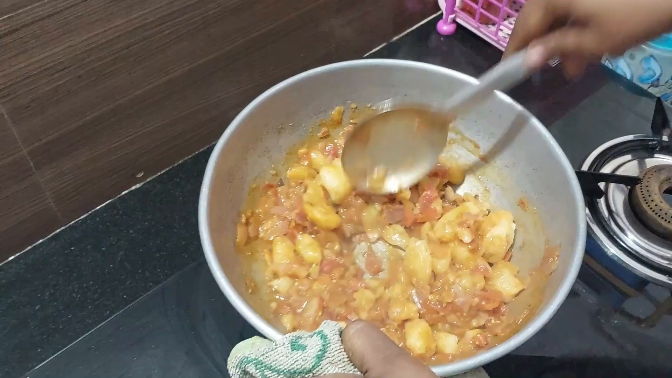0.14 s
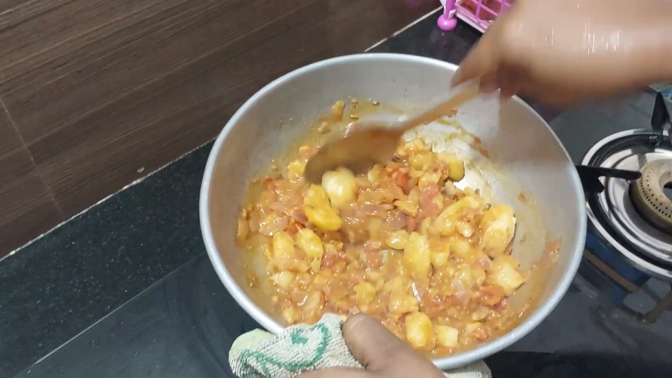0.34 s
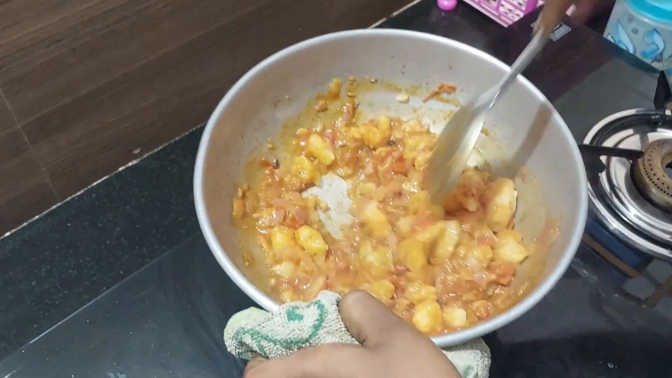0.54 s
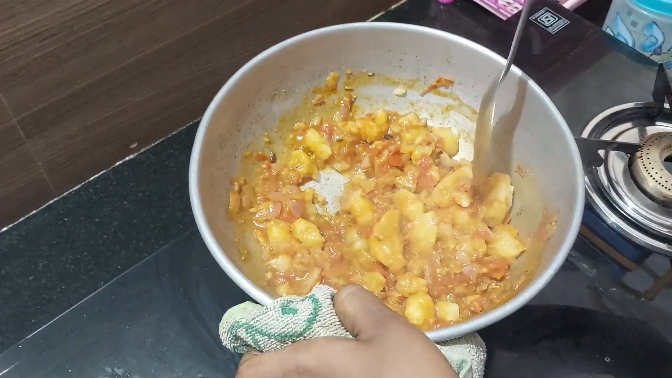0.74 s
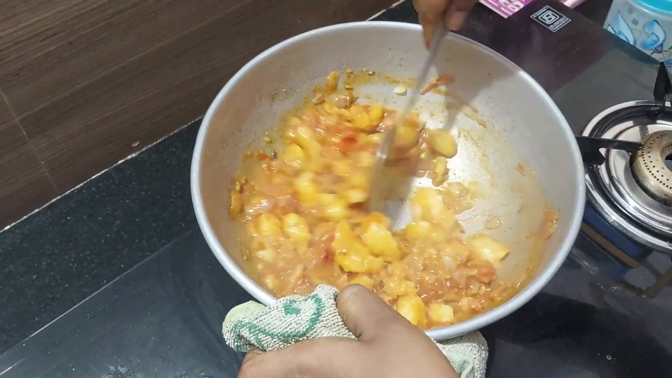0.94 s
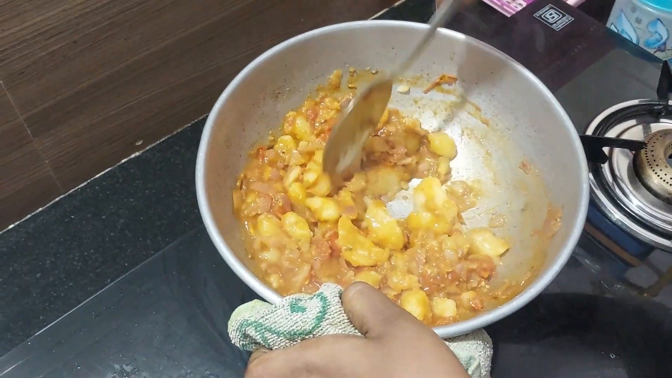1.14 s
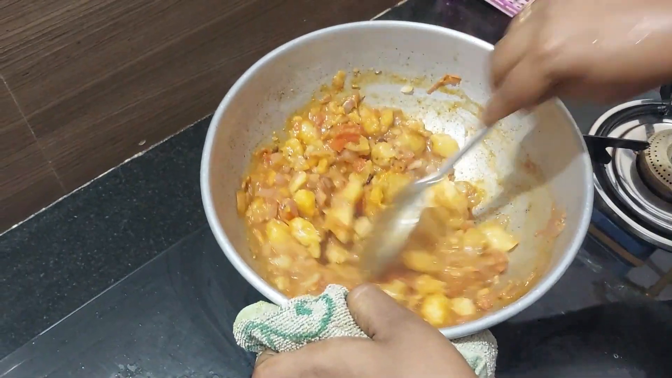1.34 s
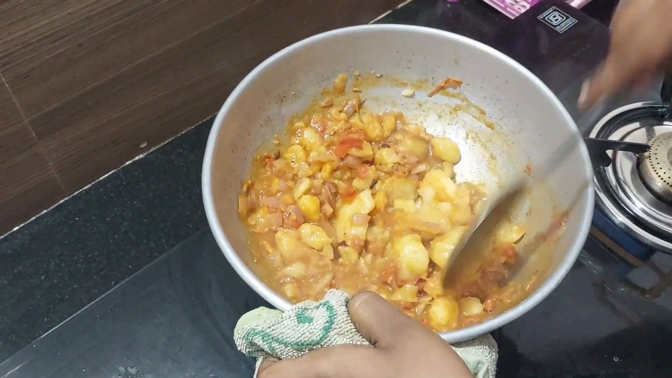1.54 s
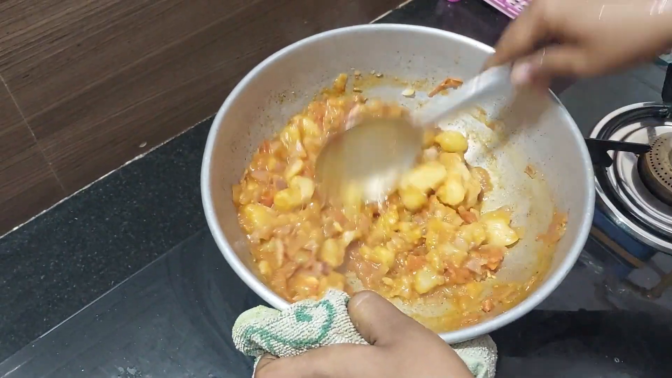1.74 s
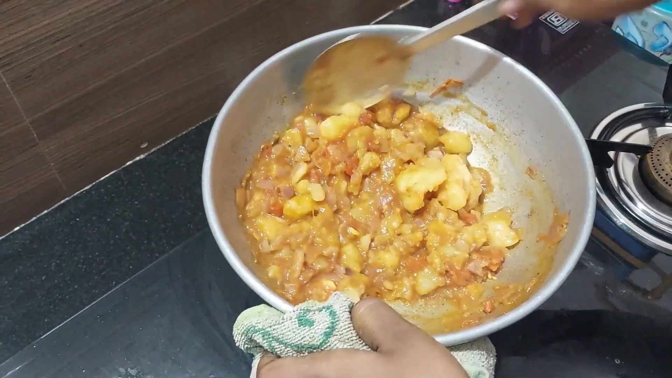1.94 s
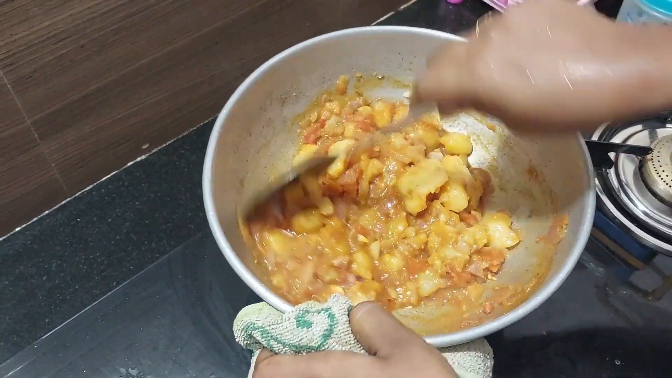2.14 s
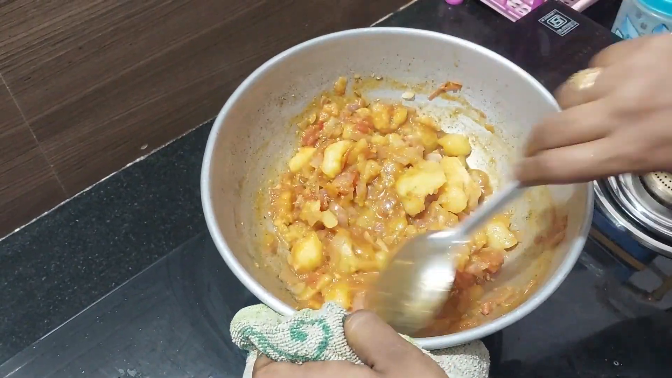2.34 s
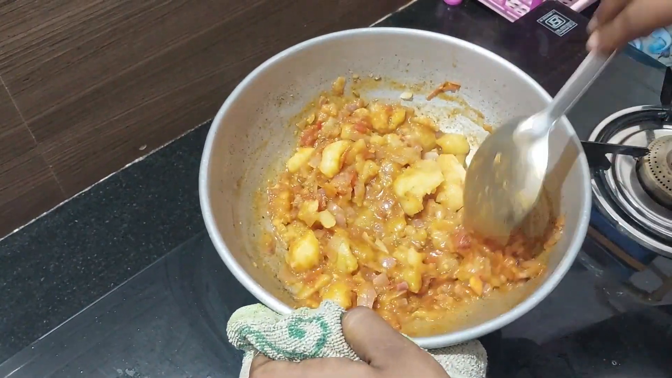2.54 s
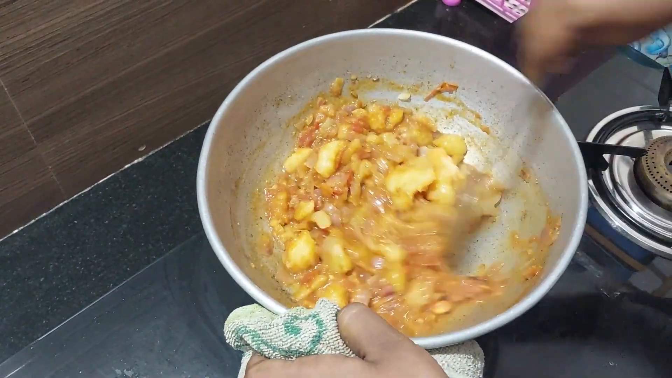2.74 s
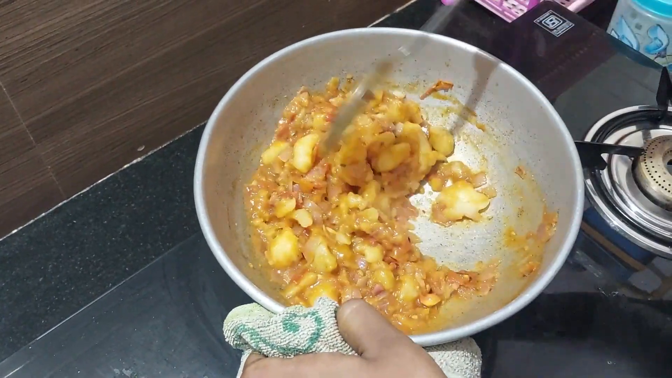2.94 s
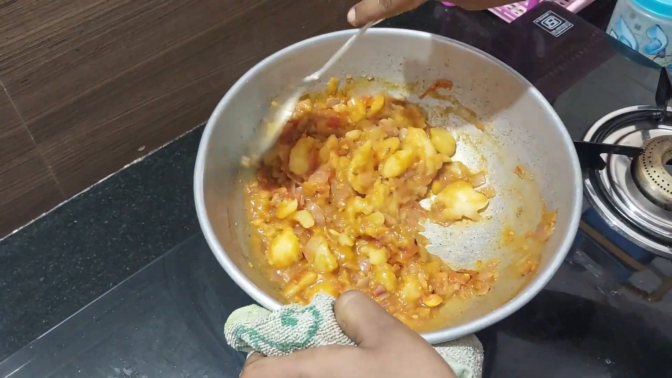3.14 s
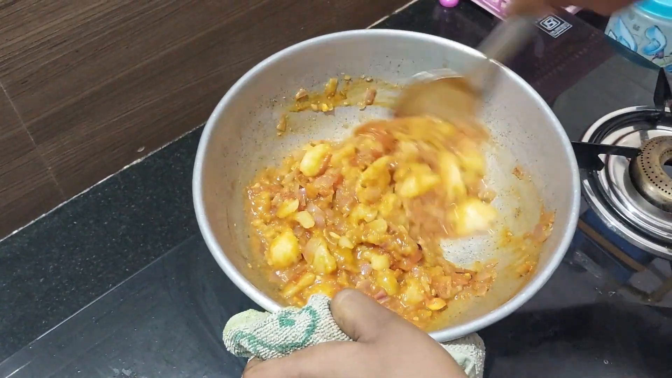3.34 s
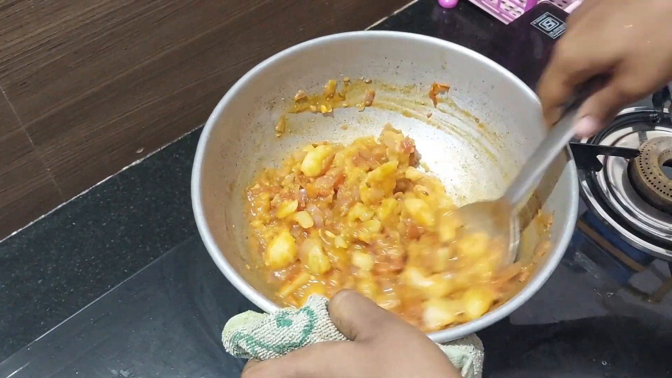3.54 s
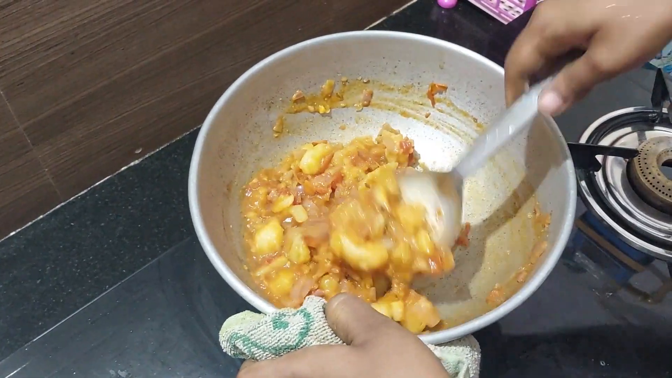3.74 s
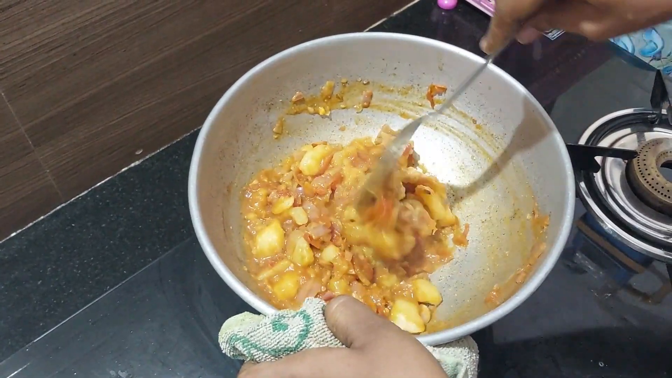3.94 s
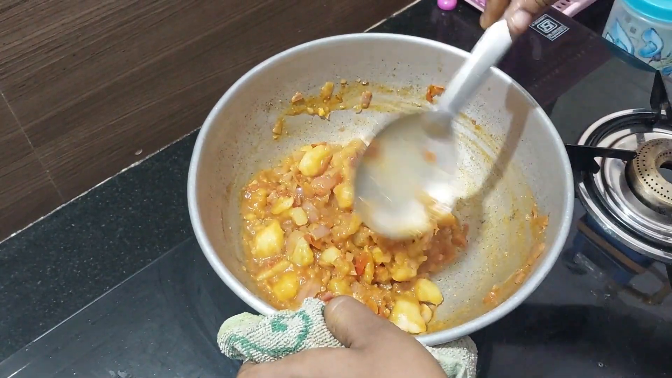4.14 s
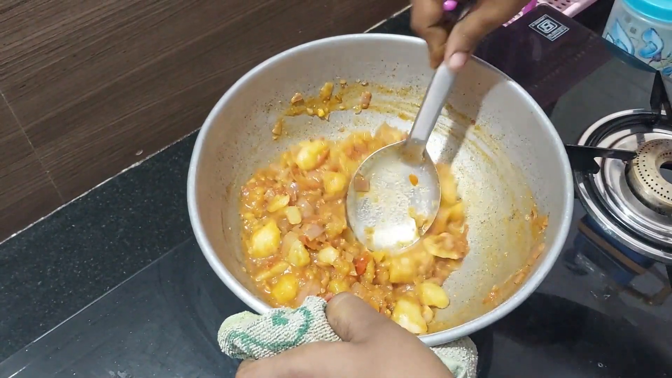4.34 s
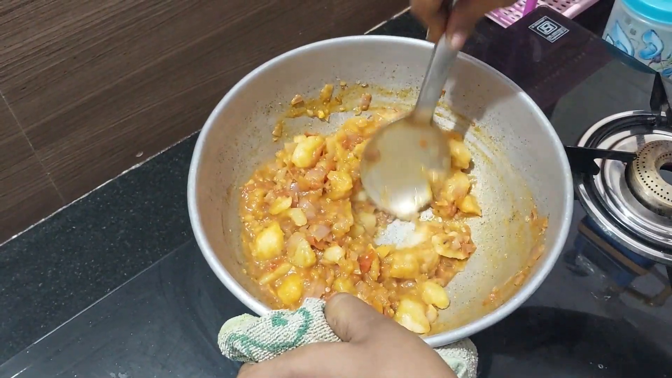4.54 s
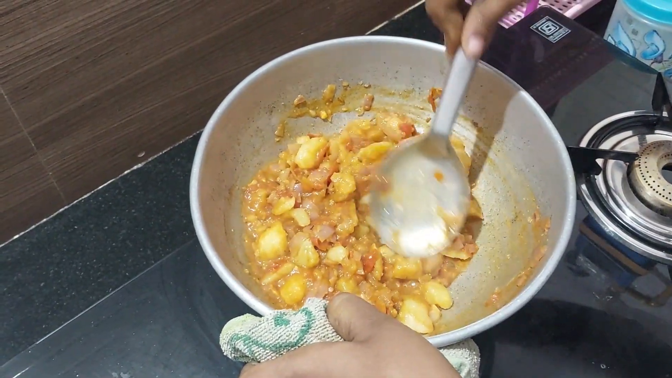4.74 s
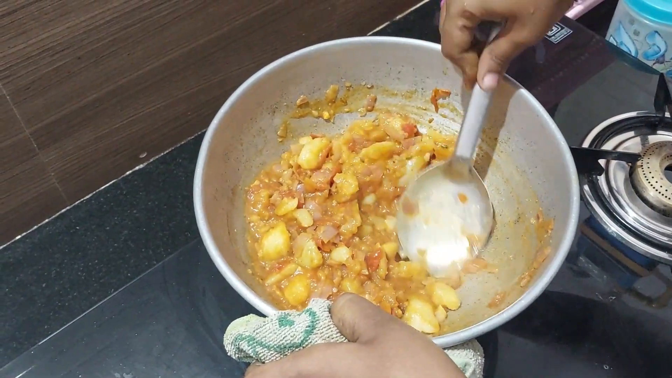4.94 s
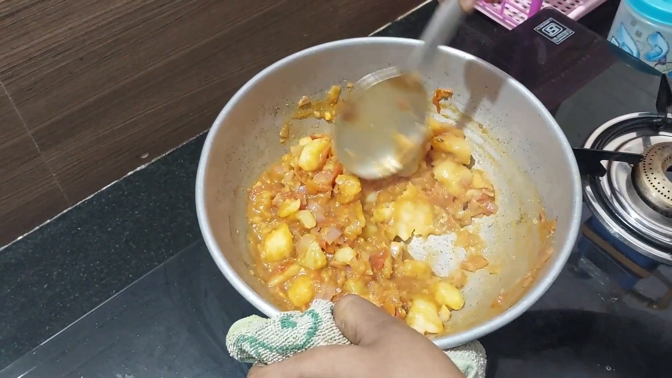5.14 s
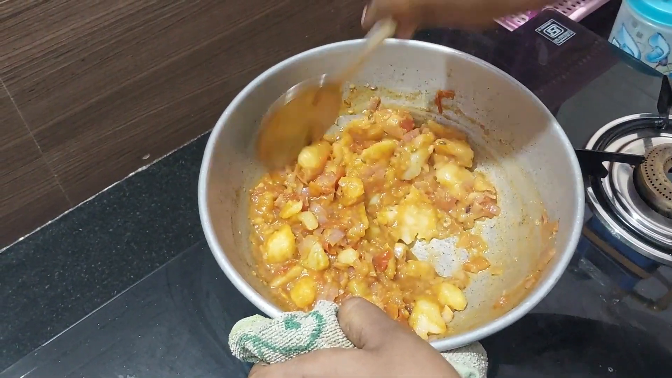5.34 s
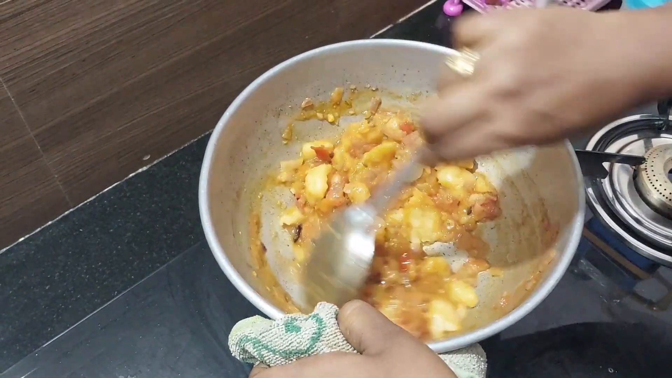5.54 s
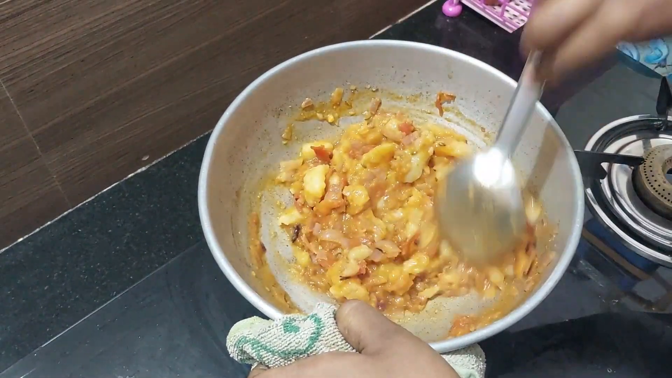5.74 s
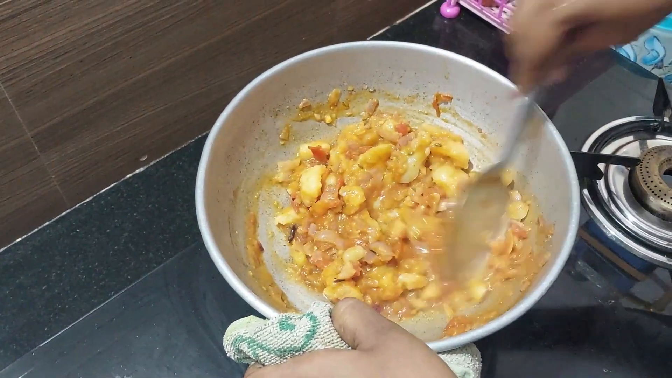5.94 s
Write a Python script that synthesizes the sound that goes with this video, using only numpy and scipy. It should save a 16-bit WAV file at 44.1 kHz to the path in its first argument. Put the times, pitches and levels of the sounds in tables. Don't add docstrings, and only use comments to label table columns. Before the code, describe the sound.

Irregular stirring recorded close on a phone: hard metallic knocks and gritty scrapes make a thin pan ring briefly, while sauce whispers and smacks in tiny wet ticks. The strongest strokes come at about one, two to two and a half, just over three, and five and a half seconds. Between them are light taps, low counter bumps, short hard-room echo and faint hiss.

```python
import sys
import numpy as np
from scipy import signal
from scipy.fft import rfft, irfft, next_fast_len
from scipy.io import wavfile
from scipy.ndimage import uniform_filter1d, map_coordinates

SR = 44100
rng = np.random.default_rng(int(sys.argv[2]) if len(sys.argv) > 2 else 0)


def rack_gain(trim_db):
    fader = np.asarray(trim_db, float)
    return 10 ** (fader / 20)


def generate_wav(signal):
    frames = np.transpose(np.atleast_2d(signal))
    scaled = np.clip(frames, -1, 1) * 32767
    pcm = np.round(scaled).astype(np.int16)
    wavfile.write(sys.argv[1], SR, pcm)


N = 268392


def unit(x):
    return x / np.sqrt(np.mean(np.abs(x) ** 2) + 1e-20)


def along(points, hz):
    f, v = np.transpose(points)
    return np.interp(np.log(hz + 1), np.log(f + 1), v)


def wobble(rate, size=N):
    knots = rng.standard_normal(int(size * rate / SR) + 4)
    return map_coordinates(knots, [np.arange(size) * rate / SR])


def ringing(modes, f):
    total = 0
    for k, (centre, width, db) in enumerate(modes):
        resonance = 1j * f * width / (centre * centre - f * f + 1j * f * width)
        total = total + (-1) ** k * rack_gain(db) * resonance
    return total


def body(modes, f, bed_db):
    tops = np.array(modes)[:, ::2]
    return ringing(modes, f) + rack_gain(along(tops, f) + bed_db)


def band(f, lo, hi):
    def pole(u):
        return 1 / (1 - u * u + np.sqrt(2) * 1j * u) ** 2
    return pole(f / hi) * np.conj(pole(lo / (f + 1)))


def stereo(pair, f, alike, lead_ms, lean_db):
    turn = np.arccos(np.clip(along(alike, f), -1, 1)) / 2
    mid, side = pair[0] * np.cos(turn), pair[1] * np.sin(turn)
    shift = rack_gain(lean_db / 2) * np.exp(1j * np.pi * f * lead_ms / 1000)
    return np.array([(mid + side) * shift, (mid - side) / shift])


def friction(size, chatter_db, grit):
    struck = rng.random((2, size)) < .02
    grains = struck * np.minimum(rng.exponential(size=(2, size)), 3.0)
    rub = rng.standard_normal((2, size)) * (1 + grit * unit(grains))
    chatter = chatter_db * wobble(68.9, size=size) + wobble(28.5, size=size)
    return unit(rub * rack_gain(chatter))


def patchy(x, depth_db):
    z = signal.stft(x, nperseg=512)[2]
    field = uniform_filter1d(rng.standard_normal(z.shape[1:]), size=5, axis=0)
    field = uniform_filter1d(field, size=11, axis=1)
    return signal.istft(z * rack_gain(depth_db * unit(field)), nperseg=512)[1][:, :N]


# (frequency [Hz], density [dB per Hz])
HUSH = [(15, -46), (25, -1), (100, -2.5), (480, -15), (1200, -21), (2300, -21.5), (3400, -29), (16300, -34)]
# (frequency [Hz], likeness [0-1])
HUSH_ALIKE = [(60, 0.38), (300, 0.64), (800, 0.3), (3000, 0.77)]


def hush():
    m = next_fast_len(N)
    f = np.fft.rfftfreq(m, 1 / SR)
    air = rfft(rng.standard_normal((2, m))) * rack_gain(along(HUSH, f))
    air = irfft(stereo(air, f, HUSH_ALIKE, lead_ms=0.16, lean_db=-3.0), m)[:, :N]
    return rack_gain(-53.5 + 0.47 * wobble(7.9)) * unit(air)


# (frequency [Hz], t60 [s])
KITCHEN = [(200, 0.52), (2000, 0.44), (10000, 0.072)]


def kitchen(x):
    hz, t, z = signal.stft(rng.standard_normal((2, SR // 2)), SR, nperseg=256)
    z[1, hz < 1200] = z[0, hz < 1200]
    decay = rack_gain(-60 * t / along(KITCHEN, hz)[:, None])
    tail = signal.istft(z * decay, SR, nperseg=256)[1]
    tail = tail / np.linalg.norm(tail[0])
    late = np.pad(x, ((0, 0), (300, 0)))
    return signal.fftconvolve(late, tail, axes=1)[:, :N]


# (frequency [Hz], width [Hz], level [dB])
COUNTER = [(68.7, 84, -13.5), (96, 32.5, -4.5), (133, 13, -4), (170.3, 10, -5.5)]
# (time [s], peak level [dB], settling [dB/s])
JOLTS = [(.21, -54, 60), (.34, -54, 40), (.54, -49, 76), (1.01, -41, 79), (1.08, -35, 194),
         (1.71, -37.5, 103), (1.8, -52, 198), (2.1, -37, 61), (2.17, -57, 170), (2.34, -48, 144),
         (2.521, -40.5, 90), (2.78, -36.5, 223), (2.93, -39, 143), (3.05, -46.5, 142), (3.25, -41, 88),
         (3.58, -50, 47), (4.56, -46.5, 91), (4.98, -43.5, 47), (5.17, -49, 110), (5.59, -41, 68),
         (5.761, -44, 179), (6.09, -29.5, 101)]


def rocking():
    tip_db_per_s, rest_db, sway_hz = 376, -65.5, 68.5
    t = np.arange(N) / SR
    push = rack_gain(rest_db)
    for s, db, fall in JOLTS:
        lost_db = np.where(t < s, tip_db_per_s * (s - t), fall * (t - s))
        push = push + rack_gain(db - lost_db)
    m = next_fast_len(N + SR // 2)
    f = np.fft.rfftfreq(m, 1 / SR)
    stone = unit(ringing(COUNTER, f) * band(f, 47, 191))
    boom = rfft(rng.standard_normal((2, N)) * push, m) * stone
    boom = irfft(stereo(boom, f, [(60, 0.94)], lead_ms=0.45, lean_db=2.5), m)[:, :N]
    pitch_hz = sway_hz * (1 + 0.043 * wobble(22.0))
    sway = np.sin(2 * np.pi * np.cumsum(pitch_hz) / SR) * push * rack_gain(4.8 * wobble(16))
    return boom + rack_gain([[2.2], [.1]]) * sway


# (time [s], level [dB])
STIR = [(0, -50.5), (.3, -61), (.9, -50), (1.5, -53.5), (2.03, -61), (2.801, -49.5), (3.15, -59),
        (3.95, -59.5), (4.28, -78), (4.799, -54.5), (5.301, -64), (6.08, -68)]


def squelch():
    s, db = np.transpose(STIR)
    f = np.fft.rfftfreq(N, 1 / SR)
    rub = rfft(friction(N, chatter_db=1.5, grit=.25))
    wet = irfft(rub * body(RIM["dull"], f, bed_db=9.0) * band(f, 2700, 16000), N)
    level_db = np.interp(np.arange(N) / SR, s, db) - 4.0
    return rack_gain(level_db) * patchy(unit(wet), depth_db=2.5)


# (time [s], peak level [dB], frequency [Hz])
TICKS = [(0.073, -41, 11000), (0.15, -30, 6800), (.391, -52, 12000), (.4219, -41, 10600),
         (0.496, -33.5, 5470), (0.508, -40, 5600), (0.525, -46, 3260), (.853, -45, 7450),
         (0.875, -42, 5200), (0.963, -29, 4040), (1.0834, -37, 11000), (1.321, -37, 5760),
         (1.462, -50, 7600), (1.495, -54, 5070), (1.7754, -41.5, 12500), (1.837, -40.5, 5600),
         (1.874, -31, 7200), (2.074, -21.5, 7530), (2.72, -31, 6840), (2.8217, -31.5, 4760),
         (2.901, -44, 12600), (2.968, -38, 6900), (2.9956, -46, 12100), (3.307, -21.5, 6350),
         (3.5274, -25, 6200), (3.547, -32, 10000), (3.592, -32, 11900), (3.645, -29.5, 6100),
         (3.758, -34.5, 6470), (4.002, -33.5, 7070), (4.0457, -46, 11500), (4.572, -44, 9000),
         (4.676, -47, 12600), (4.7845, -50, 10300), (4.866, -42, 10600), (4.901, -34, 6400),
         (4.9362, -45, 9000), (5.1218, -46, 10900), (5.4304, -31.5, 6650), (1.199, -37, 5300),
         (4.386, -36.5, 5860), (2.78, -46, 7000), (2.942, -46, 9000), (5.962, -34, 7750),
         (5.976, -35, 9260)]


def smacks():
    out, t = np.zeros(N + SR), np.arange(SR // 40) / SR
    for s, db, hz in TICKS:
        spread = rng.standard_normal(8)
        pitches = np.clip(hz * np.exp(.12 * (spread - spread.mean())), 2000, 15500)
        ring = np.sin(2 * np.pi * pitches * t[:, None]).sum(axis=1)
        envelope = rack_gain(db - 1.5 - 60 * t / .008) * (1 - np.exp(-t / .00024))
        out[round(s * SR):][:len(t)] += envelope * ring
    return np.array([out[3:N + 3], out[:N]])


# (time [s], peak level [dB], frequency [Hz], t60 [s])
CHIMES = [(.972, -26, 2010, 0.17), (1.0, -41, 1002, 0.36), (1.0, -45, 834, 0.72), (1.145, -41, 975, 0.42),
          (1.335, -43.5, 3200, 0.14), (2.111, -27, 4050, 0.11), (2.15, -22.5, 3820, 0.58),
          (2.118, -30, 2900, 0.5), (2.13, -29.5, 1340, 0.74), (2.33, -27, 2190, 0.39),
          (2.386, -25, 1620, 0.07), (2.394, -18, 1250, 0.095), (2.461, -25, 1402, 0.25),
          (2.394, -15.5, 538, .15), (2.99, -55, 3483, 0.11), (2.99, -44, 2120, 0.098),
          (3.192, -20, 3855, 0.26), (3.265, -17, 2447, 0.11), (3.36, -18, 2330, 0.088),
          (3.393, -15.5, 3350, 0.058), (3.397, -29, 3050, 0.093), (3.51, -30, 1037, 0.1),
          (3.511, -28.5, 1680, 0.084), (4.572, -35, 2004, 0.072), (.282, -51.5, 618, .4),
          (2.29, -22, 1163, 0.53), (5.06, -38, 432, 0.33), (4.951, -34, 428, 0.43),
          (0.451, -52, 1150, 0.32), (4.95, -39, 3400, 0.036), (5.04, -35, 3180, 0.059),
          (5.06, -56, 3660, 0.072), (5.325, -61, 2750, 0.38), (5.331, -63, 2490, 0.77),
          (5.483, -44, 3890, .5), (5.575, -19.5, 3810, 0.088), (5.64, -32, 3150, 0.2),
          (5.685, -37, 3200, 0.28), (5.62, -30, 834, 0.89), (5.6, -19.5, 504.3, 0.31)]


def chimes():
    rise_s, beat_db, shared = .004, 4, 0.55
    out, t = np.zeros((2, N + SR)), np.arange(SR // 2) / SR
    for s, db, hz, t60 in CHIMES:
        drift = np.array([wobble(65, size=len(t)) for _ in "LR"])
        drift = (drift + shared * drift[::-1]) / np.hypot(1, shared)
        ring = np.sin(2 * np.pi * hz * t + 2.1 * drift) * rack_gain(beat_db * drift[::-1])
        envelope = rack_gain(db - 60 * t / t60) * (1 - np.exp(-t / rise_s))
        envelope = envelope * np.minimum(10 - 20 * t, 1)
        out[:, round(s * SR):][:, :len(t)] += envelope * ring
    return out[:, :N]


# (frequency [Hz], likeness [0-1])
ALIKE = [(150, 1), (400, 0.9), (700, 0.81), (1200, 0.53), (2000, 0.36), (5000, 0.15), (12000, 0.16)]
# (frequency [Hz], left over right [dB])
LEAN = [(200, -4), (700, 3), (1500, -2), (3000, -4.5), (6000, -3.5), (10000, 2.5)]


def contact(row, metals, edges_hz, lead_ms, lean_db, f, swell_power, linger_s, upper_faster, knock):
    start, swell, db, fall, upper_db = row
    contact_s, knock_s, sudden_s = .56, 0.0011, 0.0014
    t = np.arange(round(contact_s * SR)) / SR
    after = np.maximum(t - swell, 0)
    lost_db = fall * after ** 2 / (after + linger_s)
    force = friction(len(t), chatter_db=1.2, grit=.45)
    force = force * np.minimum(t / swell, 1) ** swell_power
    force = force * np.minimum((contact_s - t) * 10, 1)
    force = force * (1 + knock * np.exp(-t / knock_s - (swell / sudden_s) ** 2))
    m = 2 * len(f) - 2
    levels = [db - lost_db, db + upper_db - upper_faster * lost_db]
    sound = 0
    for level, metal, lo, hi in zip(levels, metals, edges_hz, edges_hz[1:]):
        sound = sound + rfft(force * rack_gain(level), m) * unit(metal * band(f, lo, hi))
    heard = irfft(stereo(sound, f, ALIKE, lead_ms, lean_db + along(LEAN, f)), m)
    return round(start * SR), heard


# (start [s], swell [s], belly peak level [dB], letting go [dB/s], wall over belly [dB])
PUSHES = [(0, 0.00053, -54.5, 205, -5.5), (.26, 0.014, -55, 191, -18), (.447, 0.0038, -45, 132, -11.5),
          (.971, 0.0025, -26, 161, 0), (1.316, .006, -58, 142, 3), (1.674, 0.0091, -35.5, 149, -5.5),
          (2.06, 0.16, -31.5, 197, 3.5), (2.2, 0.23, -22, 146, 11), (2.728, 0.0034, -35, 247, -8.5),
          (2.866, 0.0012, -36, 162, -8.5), (2.989, 0.0048, -44.5, 214, 7), (3.191, 0.0006, -32.5, 84, 4.5),
          (3.335, 0.03, -36.5, 450, 11), (3.512, 0.002, -52, 508, 15.5), (3.515, 0.057, -43, 92, -1),
          (3.832, 0.0047, -46.5, 95, 2.5), (4.45, 0.13, -47.5, 499, -1.5), (4.654, 0.00099, -39.5, 268, 1),
          (4.87, 0.026, -59, 148, 4), (4.948, 0.0014, -36.5, 110, -14.5), (5.02, 0.047, -34.5, 205, -6.5),
          (5.088, 0.006, -45, 155.5, 2), (5.476, 0.056, -33, 113, 1), (5.55, 0.056, -21.5, 193, 1.5),
          (6.06, 0.069, -59, 104, 15)]
PLACES = ("sauce sauce sauce far far sauce edge near sauce sauce sauce rim " "slide slide sauce sauce sauce sauce sauce bottom bottom sauce side side side").split()
# (start [s], swell [s], blade peak level [dB], letting go [dB/s], edge hiss over blade [dB])
SLIDES = [(0, 0.0038, -56.5, 55, 1.5), (.36, 0.18, -58.5, 81, 5.5), (.872, 0.0036, -60.5, 110, 8),
          (0.969, 0.0016, -25.5, 163, -3.5), (1.318, 0.0051, -54, 129, 0), (1.678, 0.14, -56, 152, 1),
          (2.078, 0.14, -32, 296, 4), (2.111, 0.12, -29, 498, 3.5), (2.25, 0.12, -27.5, 120, 6.5),
          (2.36, 0.12, -25.5, 260, 4.5), (2.728, 0.043, -55.5, 195, 2.5), (2.821, 0.0024, -48, 207, -2.5),
          (2.988, 0.004, -53.5, 192, -17), (3.1907, 0.00054, -28.5, 78.5, 5.5),
          (3.33, 0.064, -28.5, 395.5, 0.5), (3.508, 0.034, -40, 233, 2.5), (3.76, 0.034, -68.5, 59, 11.5),
          (4.07, 0.013, -75.5, 66.5, 17.5), (4.322, 0.0027, -52, 37, 1), (4.544, 0.039, -46, 453, -9.5),
          (4.652, 0.0055, -52.5, 163, -4.5), (4.935, 0.014, -44.5, 350, -4.5),
          (5.019, 0.045, -41, 338.5, -4), (5.474, 0.085, -33.5, 117, 2.5), (5.561, 0.094, -37.5, 290, 4),
          (5.933, 0.07, -69.5, 131, 16.5)]
BLADES = ("sunk sunk dragged loaded light sunk free free swept swept sunk dragged dragged " "bare slid sunk sunk sunk sunk sunk sunk dragged dragged tilted tilted light").split()
RIMS = "dull dull wet dull dull dull dry dry dry dry dull wet dull struck dry dry wet wet dry dry wet dull dull dry dry dull".split()
# (frequency [Hz], width [Hz], level [dB])
DEEP_MODES = [(234, 17.5, -3), (297.9, 9, 3)]
PAN = { "sauce": [(430, 81, -6), (621, 47, 0), (812, 84, -6), (1168, 180, -4.5)], "far": [(293, 32.5, 4),
       (446, 20, 4.5), (585, 34, 0), (834, 26, 8), (975, 69, 6.5), (1200, 280, 1), (1427, 180, -6.5)],
       "edge": [(490, 33, 4), (1010, 75, -8), (1162, 56, -10.5), (1340, 20, -0.5), (1730, 150, -7)],
       "near": [(413, 56, 1), (513, 36, -0.5), (622, 71, 2.5), (833, 10, 2), (1092, 150, -1.5),
       (1250, 61, 6.5), (1546, 110, -3), (1890, 86, -3)], "rim": [(360, 300, -1.5), (895, 70, 1.5),
       (1077, 57, 17), (1290, 80, 12.5), (1567, 47, 11.5)], "slide": [(393, 55, -0.5), (881, 48, 8),
       (1035, 180, -6.5), (1214, 19, 7)], "bottom": [(421, 22.5, 4.5), (850, 8.4, -8), (1047, 86, -15)],
       "side": [(411, 48, 4), (516, 39, 12.5), (776.5, 31, 3), (849, 27, 6.5), (1265, 200, -7),
       (1680, 130, -8)]}
SPOON = { "sunk": [(1936, 80, -5.5), (2200, 110, 1.5), (3440, 11, -2.5), (4050, 41, 1)],
         "loaded": [(2016, 120, -0.5), (2450, 100, 0.5), (3770, 820, -6.5), (3840, 60, -6)],
         "light": [(2020, 150, -13), (3130, 340, -14), (4100, 50, -13.5)], "free": [(2410, 60, -4),
         (2920, 60, -1), (3350, 120, -9), (3820, 70, -2), (4200, 200, -12)], "swept": [(2092, 88, -6),
         (2880, 38, -9), (3810, 160, -14)], "bare": [(2050, 80, -4), (2300, 60, -3), (2500, 90, -1),
         (2800, 60, -4), (3050, 80, -6), (3820, 60, 0)], "slid": [(2330, 92, 2), (2900, 70, -0.5),
         (3080, 160, -4.5), (3400, 48, 4)], "dragged": [(2055, 84, 3.5), (2490, 120, 5), (3050, 540, -4),
         (3770, 100, 3)], "tilted": [(2140, 1500, 1), (3200, 66, 1), (3740, 91, 0.88)]}
RIM = { "wet": [(4650, 260, 3), (5300, 150, -4), (6300, 400, -3), (7500, 500, -4)],
       "dull": [(5280, 760, -1), (7900, 1200, 0.029)], "dry": [(4870, 170, -2), (5270, 67, 5.5),
       (7500, 1600, -0.5), (7850, 180, 3.5)], "struck": [(5200, 2.9, 0.5), (5600, 250, 5), (7070, 610, -8),
       (7790, 510, 0.5)]}
SPOTS = {"sauce": (0.77, 0.059, -1.23), "far": (0, 0.28, -0.17), "edge": (-7.5, 0.28, .4),
         "near": (2, 0.277, 0.3), "rim": (-24.5, 0.25, -1.5), "slide": (-1.5, 0.17, -0.074),
         "bottom": (-0.42, 0.28, 0.27), "side": (0, 0.16, 0.8)}
GRIPS = {"sunk": 2.7, "loaded": 4, "light": -1, "free": -11.5, "swept": 1, "bare": -33, "slid": 0,
         "dragged": -0.99, "tilted": -1}
EDGES_HZ = [205, 700, 1800, 4200, 17000]
# (frequency [Hz], level [dB])
TREBLE = [(8000, -7.5), (8600, -15.5), (10000, -12), (12000, -7), (14000, -10.5), (16000, -10)]
# (time [s], extra force [dB], length [s])
CATCHES = [(0.972, 4, 0.0038), (0.994, -0.5, 0.009), (1.02, -0.5, .008), (1.695, -1.5, .004),
           (1.764, 8, 0.019), (2.114, 5.5, 0.0088), (2.168, 2.5, 0.014), (2.245, -4, 0.013),
           (2.335, 1, .012), (2.36, -1, 0.009), (2.373, 0, .006), (2.396, 0.5, .008), (2.423, -0.5, 0.0052),
           (2.435, -3.5, 0.017), (2.485, -1, 0.024), (2.93, 4.5, .012), (3.205, -0.5, 0.0032),
           (3.225, -0.5, 0.013), (3.44, -2.5, .012), (3.413, 1, .008), (3.205, -3.5, 0.0056),
           (3.278, -2, .01), (3.295, -10, 0.011), (3.33, 0.5, .008), (3.345, 3, 0.0061), (3.376, 2, 0.011),
           (3.387, -5.5, .006), (3.398, 3.5, 0.0062), (4.567, 3.5, 0.01), (4.957, 3, 0.006),
           (2.868, -0.5, .004), (3.515, -1.5, .004), (5.014, 7, 0.0048), (5.126, 5, 0.016),
           (5.554, 0, 0.0065), (5.612, 1, .004), (5.62, 0.5, .006), (5.628, -4, 0.0068), (5.585, 0.5, .01),
           (5.645, 2.5, 0.012), (5.668, 5.5, .006)]


def strokes():
    out, f = np.zeros((2, N + SR)), np.fft.rfftfreq(32768, 1 / SR)
    heard = []
    for row, place in zip(PUSHES, PLACES):
        damp_db, lead_ms, lean_db = SPOTS[place]
        pan = body(DEEP_MODES + PAN[place], f, bed_db=damp_db - 11)
        heard.append(contact(row, [pan, pan], EDGES_HZ[:3], lead_ms, lean_db, f,
                             swell_power=0.98, linger_s=0.049, upper_faster=1.28, knock=1.8))
    for row, grip, wetness in zip(SLIDES, BLADES, RIMS):
        nearest = np.argmin([abs(push[0] - row[0]) for push in PUSHES])
        _, lead_ms, lean_db = SPOTS[PLACES[nearest]]
        blade = body(SPOON[grip], f, bed_db=GRIPS[grip] - 11)
        rim = body(RIM[wetness], f, bed_db=-7) * rack_gain(along(TREBLE, f))
        heard.append(contact(row, [blade, rim], EDGES_HZ[2:], lead_ms, lean_db, f,
                             swell_power=0.5, linger_s=0.044, upper_faster=0.97, knock=0.41))
    for at, sound in heard:
        out[:, at:at + sound.shape[1]] += sound
    ms = np.arange(0, N / SR, 1 / 1000)
    catch_db = sum(db * np.exp(-((ms - s) / length) ** 2) for s, db, length in CATCHES)
    catching = np.interp(np.arange(N) / SR, ms, rack_gain(catch_db))
    return patchy(out[:, :N] * catching, depth_db=1.4) * rack_gain(2.2)


def scene():
    near = strokes() + smacks() + chimes()
    return near + rack_gain(-8.5) * kitchen(near) + rocking() + hush() + squelch()


# (frequency [Hz], share of empty bands [0-1])
STARVE = [(3000, .02), (4300, .07), (5000, .02), (8100, .015), (8500, .38), (9700, .27), (10500, .05),
          (13200, .04), (15400, .25), (16000, .87)]


def starved(x):
    hz, _, z = signal.stft(x, SR, nperseg=1024)
    size = 8
    band_hz = hz[:-1:size]
    luck = rng.standard_normal((len(hz) // size, z.shape[2]))
    luck = uniform_filter1d(uniform_filter1d(luck, size=4, axis=1), size=2, axis=0)
    loud = np.log(np.mean(np.abs(z[0, hz > 8000]) ** 2, axis=0) + 1e-12)
    luck = unit(luck) + 0.46 * unit(loud - loud.mean()) * (band_hz[:, None] < 13000)
    rank = np.argsort(np.argsort(luck, axis=1), axis=1) / luck.shape[1]
    share = along(STARVE, band_hz) * (band_hz > 3000)
    empty = rank < share[:, None]
    z[:, :-1] *= 1 - np.repeat(empty, size, axis=0)
    return signal.istft(z, SR, nperseg=1024)[1][:, :N]


def roll_off(x):
    return signal.sosfilt(signal.butter(12, 16480, fs=SR, output="sos"), x)


def record(dry):
    m = next_fast_len(N + SR // 4)
    microphone = band(np.fft.rfftfreq(m, 1 / SR), 45, 24000)
    heard = irfft(rfft(dry, m) * microphone, m)[:, :N]
    mix = starved(np.clip(heard, -.92, .92))
    return roll_off(mix)


dry = scene()
out = record(dry)
generate_wav(out)
```